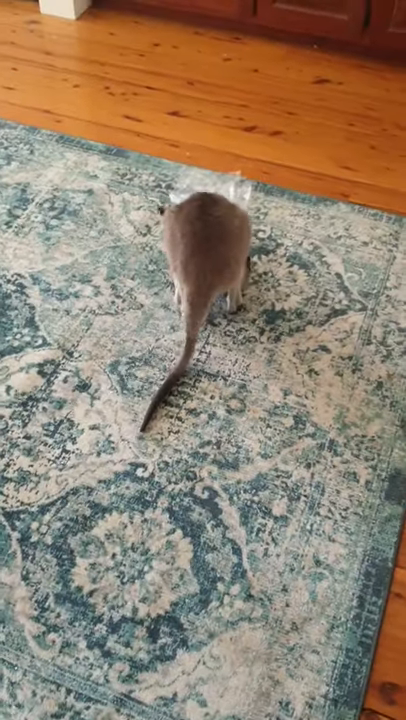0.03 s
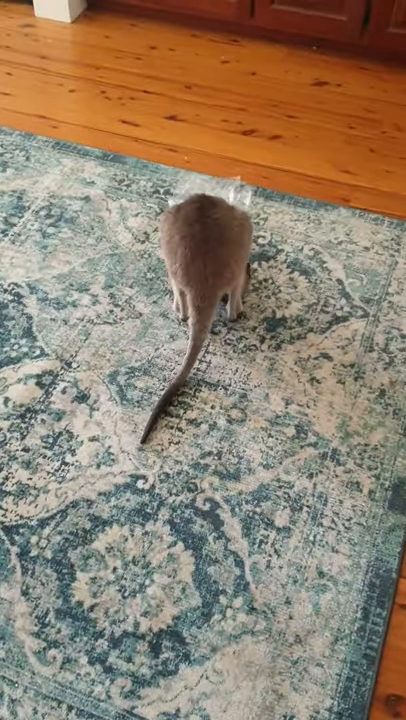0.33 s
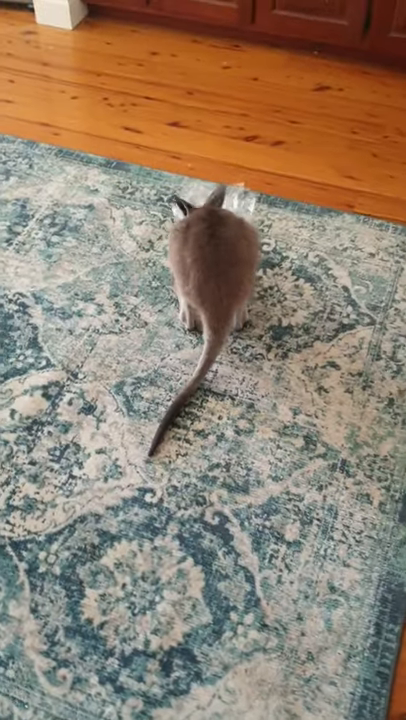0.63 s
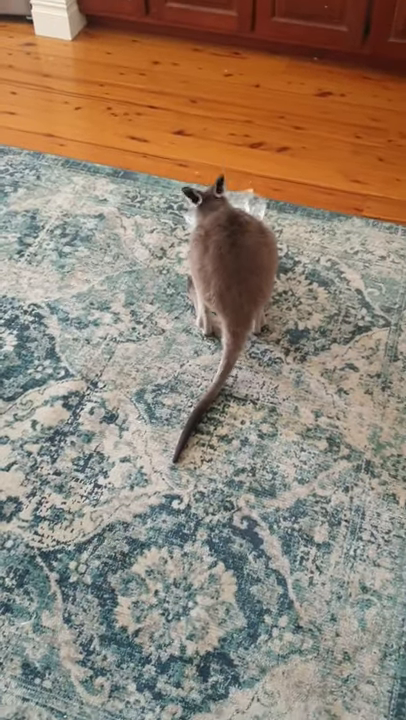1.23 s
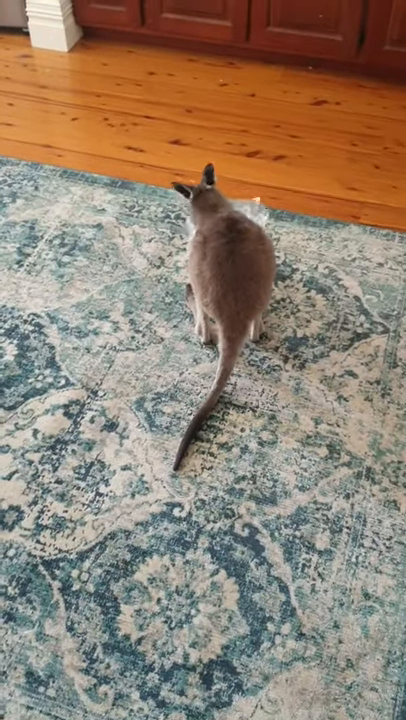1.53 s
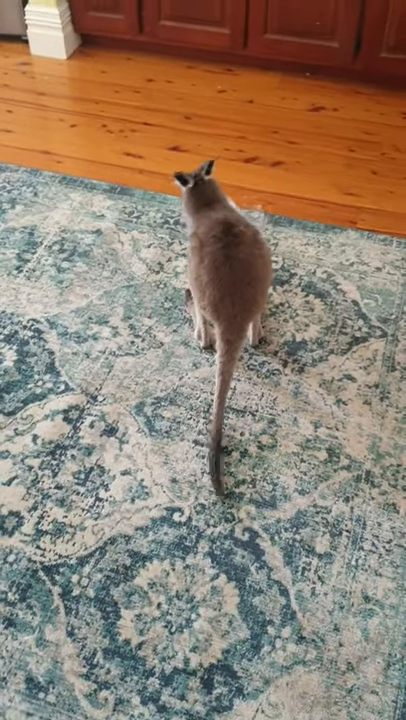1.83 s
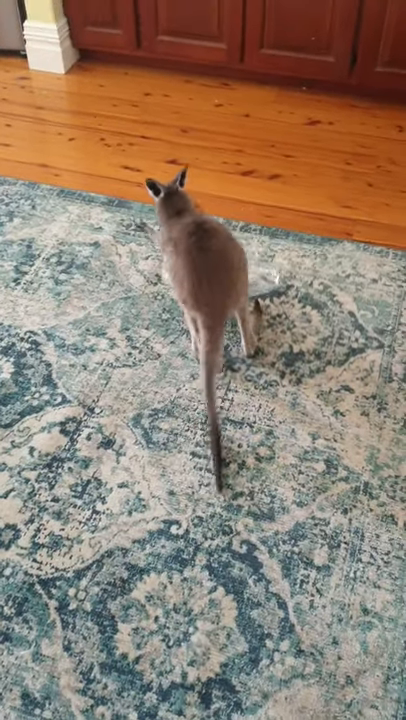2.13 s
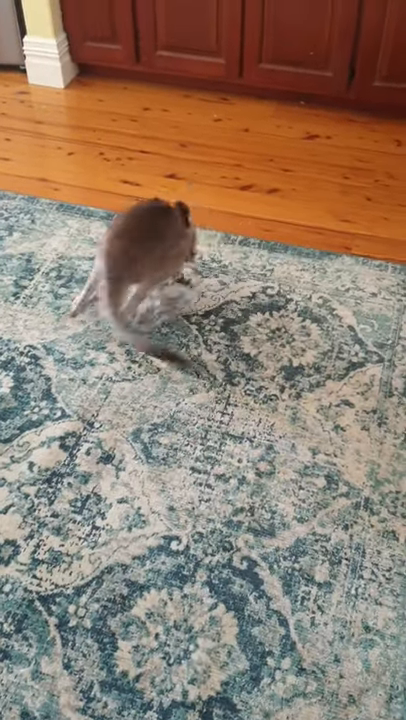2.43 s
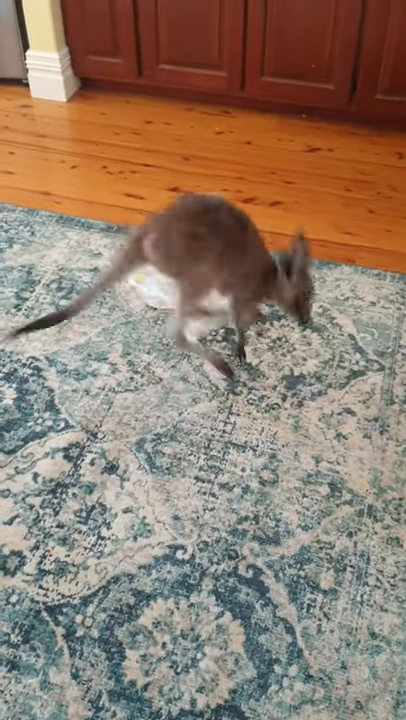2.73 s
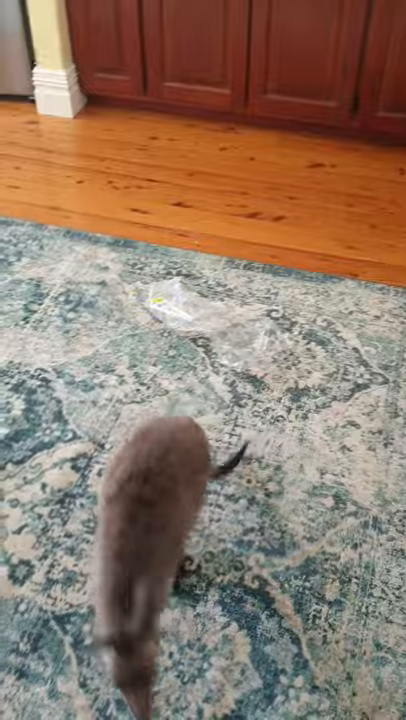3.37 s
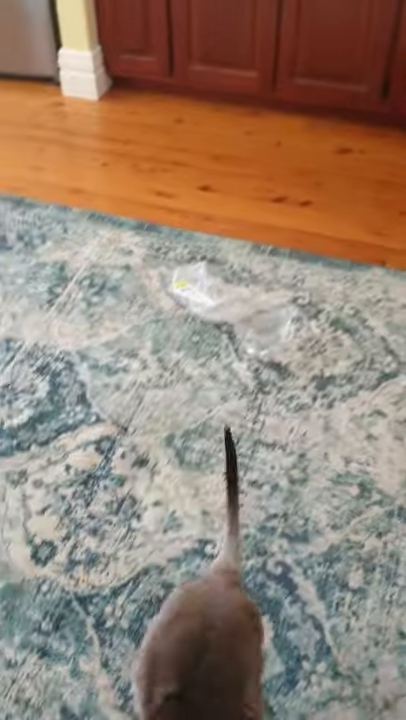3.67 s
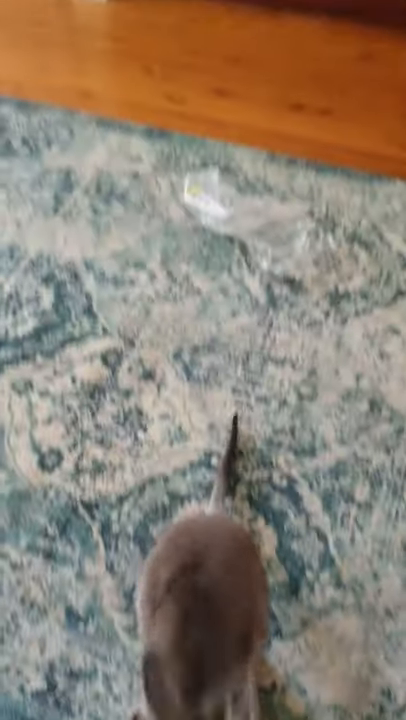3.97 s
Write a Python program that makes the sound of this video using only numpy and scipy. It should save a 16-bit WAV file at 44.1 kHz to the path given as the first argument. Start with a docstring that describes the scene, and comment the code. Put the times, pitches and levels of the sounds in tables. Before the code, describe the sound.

A thin plastic bag rustles faintly, then crinkles louder as a young kangaroo noses and drags it. Soft hops then thump on a rug over a wooden floor, coming towards a hand-held phone in a slightly echoing room.

```python
"""Young kangaroo with a plastic bag

A young kangaroo noses a thin plastic bag on a rug, drags it underfoot and hops towards a hand-held
phone. Creases of the film snap in dense swarms; landings shake the wooden floor, boards clack and
claws tick in a live room, and fur swishes over the pile. Fingers bump the phone; faint hiss, thin
whistles and a few short high chirps lie behind."""
import sys
import numpy as np
from scipy import signal
from scipy.fft import rfft, irfft
from scipy.io import wavfile
from scipy.ndimage import uniform_filter1d

SR = 44100
rng = np.random.default_rng(int(sys.argv[2]) if len(sys.argv) > 2 else 0)


def store_pcm(level_fs):
    """Save levels as 16-bit WAV."""
    pcm = np.round(np.clip(level_fs, -1, 1) * 32767).astype(np.int16)
    wavfile.write(sys.argv[1], SR, np.atleast_2d(pcm).T)


N = 176400
T = np.arange(N) / SR
FREQS = np.fft.rfftfreq(N, 1 / SR)

# how hard the bag is crumpled (time [s], level [dB])
CRUMPLE_CURVE = [(0, -68.5), (.5, -70.5), (.62, -62.5), (.72, -73.5), (.95, -63), (1.05, -55.5),
                 (1.15, -56.5), (1.3, -50), (1.4, -52.5), (1.52, -57.5), (1.555, -41), (1.63, -41.5),
                 (1.68, -38.5), (1.75, -44.5), (1.87, -36.5), (1.93, -39), (2.0, -33), (2.04, -35.5),
                 (2.08, -29), (2.16, -36.5), (2.24, -38), (2.33, -44), (2.39, -38), (2.415, -28),
                 (2.45, -24.5), (2.5, -31), (2.525, -23), (2.56, -34.5), (2.62, -42), (2.72, -41),
                 (2.775, -31.5), (2.82, -36.5), (2.88, -44), (2.96, -55), (3.15, -67), (4, -65.5)]
# tone of the plastic film (frequency [Hz], level [dB])
FILM_EQ = [(60, -6), (110, -7.5), (260, -3), (400, -0.5), (550, -5), (750, 2), (1000, -5), (1400, -2),
           (2050, 0), (2600, -3.5), (3500, -4.5), (5000, 0.5), (6000, -1), (6900, 1), (8000, -9.5),
           (9000, -17.5), (10200, -8), (11400, -2), (13000, -6), (14500, -11.5)]
# feet landing on the rug (time [s], level [dB], brightness [Hz], floor boom [dB])
FOOTFALLS = [(1.392, -47.5, 99, -3), (1.517, -45.5, 720, -27), (2.514, -29.5, 484, -2),
             (2.538, -26.5, 410, 1), (2.576, -32, 460, -13), (2.940, -34, 587, 0), (2.946, -23.5, 280, -17),
             (2.958, -27.5, 267, -4.5), (2.984, -26.5, 220, -25), (3.075, -39.5, 258, -14),
             (3.278, -29.5, 404, 2), (3.346, -26.5, 260, -4.5), (3.696, -33.5, 260, -31),
             (3.702, -25, 253, 6), (3.736, -26, 221.5, 0), (3.806, -35, 216, 3)]
# tone of a thud before its treble is softened (frequency [Hz], level [dB])
THUD_EQ = [(15, -56), (30, -21), (50, -5), (75, -6.5), (110, -5.5), (175, -1), (280, 1.5), (500, -5),
           (900, -3), (2000, 3), (5000, 9), (12000, -39)]
# modes of the wooden floor (frequency [Hz], level [dB], t60 [s])
FLOOR_MODES = [(48.1, -15, 0.81), (61.5, -13.5, 1), (87.5, -7, 0.46), (121, -4, 0.23), (148.4, -8.5, 0.51),
               (192.7, -2, 0.61), (226, -33, 0.25), (248.4, -22, .5), (282, -21, 0.61), (374, -33.5, 0.98)]
# boards giving and springing back underfoot (frequency [Hz], level [dB], t60 [s])
FLEX_MODES = [(140, -17, 0.076), (177.5, -4, 0.21), (259, -7, 0.11)]
# hard knocks on the boards (time [s], level [dB], pitch [ratio])
BOARD_KNOCKS = [(2.521, -25, 1.84), (2.536, -24, 1.47), (3.277, -17.5, 1.036), (3.331, -31.5, 1.34),
                (3.348, -39, 1.1), (3.704, -42, 0.75)]
# tone of a knock's attack at pitch 1 (frequency [Hz], level [dB])
CLACK_EQ = [(30, -65), (100, -40), (300, 2.5), (500, -0.5), (680, 2), (860, 9), (1150, -14), (1400, -9),
            (2100, -13), (2800, -41), (6000, -26.5), (9000, -58), (14000, -34)]
# modes of a knocked board at pitch 1 (frequency [Hz], level [dB], t60 [s])
PLANK_MODES = [(472, -3.5, .035), (640, -5.5, 0.018), (745, 2, 0.034), (823, -4.5, 0.028),
               (1285, -16.5, .03), (2030, -18, 0.053)]
# claws and single creases (time [s], level [dB], decay [s], top shelf [dB], room send [dB])
TICK_HITS = [(.183, -41.5, 0.0086, 17, -14), (.616, -50.5, 0.016, 9, -10.5), (0.642, -51.5, 0.028, 10, -14),
             (1.067, -53, 0.0044, -11, -18), (1.285, -43, 0.0043, 17, -3), (2.397, -42, 0.0018, 12, -14),
             (2.773, -35, 0.0068, -7, -3), (3.277, -32.5, 0.0017, 1, -8), (3.348, -36.5, 0.0053, -10, -5),
             (3.704, -24, 0.0018, -8.5, -6.5)]
# tone of a tick (frequency [Hz], level [dB])
TICK_EQ = [(30, -43), (300, -24), (1500, -6), (3000, -6.5), (4500, -2.5), (6500, -2), (9000, -22),
           (11500, -11), (14500, -19)]
# fur and tail brushing the rug (centre [s], half width [s], level [dB])
SWISHES = [(.62, 0.038, -68), (3.32, 0.026, -60), (3.44, 0.18, -56), (3.7, 0.16, -52.5)]
# tone of fur on the pile (frequency [Hz], level [dB])
FUR_EQ = [(100, -25), (1000, -9), (2500, 0.5), (4700, 1.5), (7000, 1), (9000, -27), (11500, -2),
          (14500, 1.5)]
# fingers bumping the phone (time [s], level [dB], pitch [Hz], decay [s], scuff [dB])
FINGER_HITS = [(.02, -44.5, 81, 0.071, -11), (0.082, -34, 61, 0.055, -38), (0.185, -30.5, 99, 0.0091, -7),
               (0.477, -35, 118, 0.004, -25), (0.608, -34.5, 138, 0.015, -10.5),
               (0.638, -44, 310, 0.017, -3.5), (1.022, -9, 239, 0.0017, -22),
               (1.029, -19.5, 160, 0.0026, -27), (1.044, -19.5, 161, 0.0041, -23)]
# thin whistles (start [s], end [s], pitch [Hz], level [dB])
WHISTLE_NOTES = [(.25, 1.25, 5510, -67), (.42, .95, 5893, -68), (3.05, 3.3, 5510, -70)]
# faint high chirps (start [s], length [s], from [Hz], to [Hz], level [dB])
CHIRP_NOTES = [(0.85, .08, 4350, 4380, -63), (0.968, 0.15, 4150, 5050, -56), (1.07, .09, 4750, 4550, -68),
               (1.26, 0.073, 4800, 4600, -71), (3.385, 0.117, 4700, 4850, -57),
               (3.56, 0.13, 4750, 4750, -65)]
# tone of the hiss (frequency [Hz], level [dB])
HISS_EQ = [(20, -24), (45, 0), (80, -9.5), (250, -13.5), (470, -8.5), (560, -19.5), (850, -20.5),
           (1300, -30), (1900, -40), (2500, -40.5), (3100, -23.5), (3700, -38.5), (4500, -27),
           (5700, -26.5), (7000, -25), (8800, -48.5), (11500, -28), (14500, -35)]
# reverb time of the room (frequency [Hz], t60 [s])
ROOM_DECAY = [(60, 0.71), (160, 0.41), (420, 0.75), (1100, 0.9), (3000, 0.81), (7500, 0.51), (14000, 0.21)]
# response of the weaker left microphone (frequency [Hz], gain [dB])
LEFT_MIC_EQ = [(60, -10.5), (250, -11), (600, -9), (1100, -9), (2300, -10.5), (4500, -11.5), (13000, -10)]

BAG_ROOM_DB, THUD_ROOM_DB, CLACK_ROOM_DB = -1.5, 4.5, 1  # reverb sends


def bag(peak_snaps_per_s=1100, rate_law=0.29, clump_s=0.0067, clump_db=1.5, trim_db=1.5):
    """Creases snap in clumps, faster and harder with the crumpling; each briefly rings the film."""
    crumple_db = np.interp(T, *np.array(CRUMPLE_CURVE).T)
    rate = peak_snaps_per_s * undb(rate_law * (crumple_db - crumple_db.max()))  # for each pitch
    snaps, t = np.zeros(N), T[:256]
    for hz in np.geomspace(500, 14000, 12):
        hits = (rng.random(N) < rate / SR) * rng.choice([-1, 1], N) / np.sqrt(rate)
        ring_s = 0.00049 * np.sqrt(2000 / hz)
        ring = np.exp(-t / ring_s) * np.sin(2 * np.pi * hz * t)
        snaps += unit(np.convolve(hits, ring)[:N]) * np.sqrt(hz)
    # flatten the swarm's own spectrum, then give it the film's tone
    swarm_db = 10 * np.log10(uniform_filter1d(np.abs(rfft(snaps)) ** 2, size=2001))
    film = unit(colour(snaps, on_log(FREQS, FILM_EQ) - swarm_db))
    env = undb(crumple_db + trim_db + clump_db * wobble(int(clump_s * SR)))
    return film * env / np.sqrt(1 + undb(BAG_ROOM_DB) ** 2)  # leave space for the reverb


def thuds(decay_s=0.013, rolloff_order=2.52, scrape_db=-2):
    """Each foot lands through the rug: one dull push and a weaker scrape."""
    out = 0
    for start, db, bright_hz, _ in FOOTFALLS:
        eq = on_log(FREQS, THUD_EQ) - 10 * rolloff_order * np.log10(1 + (FREQS / bright_hz) ** 2)
        push = np.zeros(N)
        push[int(start * SR)] = np.sqrt(decay_s * SR / 2)
        out += undb(db) * (colour(push, eq) + undb(scrape_db) * burst(start, decay_s, eq))
    return out


def floor_boom(flex_db=-0.5):
    """Each landing sets the whole floor booming and flexes the boards underfoot."""
    out = 0
    for start, db, _, boom_db in FOOTFALLS:
        out += undb(db + boom_db) * struck(FLOOR_MODES, start)
        out += undb(db + flex_db) * struck(FLEX_MODES, start)
    return out


def clacks(attack_decay_s=0.006, ring_db=4):
    """Hard knocks of foot on board, each with a short hollow ring."""
    out = 0
    for start, db, pitch in BOARD_KNOCKS:
        attack = burst(start, attack_decay_s, on_log(FREQS / pitch, CLACK_EQ))
        out += undb(db) * (attack + undb(ring_db) * struck(PLANK_MODES, start, pitch))
    return out


def ticks(tails):
    """Tiny bright contacts of claws and single creases; the nearer ones are drier."""
    top_shelf = on_log(FREQS, [(7000, 0), (11000, 1)])
    close, send = 0, 0
    for start, db, decay_s, top_db, room_db in TICK_HITS:
        tick = undb(db) * burst(start, decay_s, on_log(FREQS, TICK_EQ) + top_db * top_shelf)
        close += tick
        send += undb(room_db) * tick
    return direct(close) + echoes(send, tails)


def fur():
    """Soft swishes of fur over the pile."""
    env = sum(undb(db) * np.exp(-((T - centre) / width) ** 2) for centre, width, db in SWISHES)
    return env * stereo_noise(FUR_EQ)


def finger_bumps(scuff_hz=600, low_cut_hz=50):
    """Fingers knock the phone's case: a dry low pulse with a little scuff."""
    scuff = colour(rng.standard_normal(N), -20 * np.log10(1 + (FREQS / scuff_hz) ** 2))
    knocks = 0
    for start, db, hz, decay_s, scuff_db in FINGER_HITS:
        body = np.sin(2 * np.pi * hz * (T - start))
        knocks += undb(db) * fade(start, decay_s) * (undb(scuff_db) * scuff - body)
    return butter(knocks, 2, low_cut_hz, "high")


def whistles(fade_s=0.033):
    """Thin high tones that come and go at a steady pitch."""
    out = 0
    for start, end, hz, db in WHISTLE_NOTES:
        gate = np.clip(np.minimum(T - start, end - T) / fade_s, 0, 1)
        out += undb(db) * gate * np.sin(2 * np.pi * hz * T)
    return out


def chirps():
    """Short high glides with a slight waver in pitch."""
    waver = 1 + 0.008 * wobble(150)
    out = 0
    for start, length, from_hz, to_hz, db in CHIRP_NOTES:
        progress = np.clip((T - start) / length, 0, 1)
        hz = (from_hz + (to_hz - from_hz) * progress) * waver
        out += undb(db) * np.sin(np.pi * progress) * np.sin(2 * np.pi * np.cumsum(hz) / SR)
    return out


def background(hiss_db=-57.5, flutter_db=2, flutter_s=0.049):
    """A bed of quiet hiss, with whistles and chirps fluttering in level."""
    hiss = undb(hiss_db) * stereo_noise(HISS_EQ)
    tones = whistles() + chirps()
    return hiss + tones * undb(flutter_db * wobble(int(flutter_s * SR)))


def room_tails(alike_hz=440, build_s=0.0027, early_boost=0.59, early_s=0.024):
    """A stereo reverb tail, alike in the bass, with strong first reflections and a decay per band."""
    t, freqs = T[:SR], np.fft.rfftfreq(SR, 1 / SR)
    common, apart = rfft(rng.standard_normal((2, SR)))
    alike = 1 / (1 + (freqs / alike_hz) ** 4)
    noise = np.array([common, alike * common + np.sqrt(1 - alike ** 2) * apart])
    onset = (1 - np.exp(-t / build_s)) * (1 + early_boost * np.exp(-t / early_s))
    out = 0
    for band_hz, t60 in ROOM_DECAY:
        band = on_log(freqs, [(hz, hz == band_hz) for hz, _ in ROOM_DECAY])
        env = onset * np.exp(-np.log(1000) * t / t60)
        out += irfft(noise * band) * env / np.sqrt(np.sum(env ** 2))
    return out


def echoes(x, tails, cycle_s=0.2):
    """Reverb that crossfades round the tails, like the shifting echoes of a moving animal."""
    out = 0
    for k, tail in enumerate(tails):
        share = np.maximum(np.cos(2 * np.pi * (T / cycle_s - k / len(tails))), 0)
        out += signal.fftconvolve((share * x)[None], tail, axes=1)[:, :N]
    return out


def direct(x, shadow_hz=563):
    """Dry sound as (right, left): the left microphone is shadowed in the treble."""
    return np.array([x, butter(x, 1, shadow_hz, "low")])


def in_room(x, tails, room_db):
    """Direct sound plus its echoes."""
    return direct(x) + undb(room_db) * echoes(x, tails)


def struck(modes, start, pitch=1):
    """Modes that ring for up to half a second from one blow."""
    out, i, t = np.zeros(N), int(start * SR), T[:SR // 2]
    ring = sum(undb(db) * np.exp(-np.log(1000) * t / t60) * np.sin(2 * np.pi * hz * pitch * t)
               for hz, db, t60 in modes)
    out[i:i + len(t)] = ring[:N - i]
    return out / 2


def burst(start, decay_s, eq):
    """A short coloured scrape, level 1 at its start."""
    env = fade(start, decay_s)
    return unit(colour(env * rng.standard_normal(N), eq)) * np.sqrt(np.mean(env ** 2))


def fade(start, decay_s):
    """Sudden start and exponential fall."""
    return (T >= start) * np.exp(-np.maximum(T - start, 0) / decay_s)


def stereo_noise(points):
    """Wide coloured noise, rms 1 on each side."""
    return np.array([unit(colour(rng.standard_normal(N), on_log(FREQS, points))) for _ in range(2)])


def wobble(samples):
    """Smoothed random motion, rms 1."""
    return unit(uniform_filter1d(rng.standard_normal(N), size=samples))


def colour(x, eq):
    """Minimum-phase EQ of unit power gain, shaped by a dB value at each of FREQS."""
    cepstrum = irfft(np.log(unit(undb(eq))), N)
    cepstrum[1:N // 2] *= 2
    cepstrum[N // 2 + 1:] = 0
    impulse = irfft(np.exp(rfft(cepstrum)), N)[:N // 16]
    return signal.fftconvolve(x, impulse)[:N]


def butter(x, order, hz, kind):
    """Plain low-pass or high-pass."""
    return signal.sosfilt(signal.butter(order, hz, kind, fs=SR, output="sos"), x)


def on_log(hz, points):
    """Read (Hz, value) points on a log-frequency axis."""
    point_hz, values = np.array(points, float).T
    return np.interp(np.log(np.maximum(hz, 1)), np.log(point_hz), values)


def undb(db):
    """Decibels to gain."""
    return 10 ** (np.asarray(db) / 20)


def unit(x):
    """Scale to rms 1."""
    return x / np.sqrt(np.mean(x ** 2))


def scene(bump_left_db=-30, background_left_db=-22):
    """Bag and feet in the room, stronger on the right; handling noise and background on top."""
    tails = [room_tails() for _ in range(4)]
    feet = in_room(thuds(), tails, THUD_ROOM_DB) + floor_boom()
    crinkle = in_room(bag(), tails, BAG_ROOM_DB)
    boards = in_room(clacks(), tails, CLACK_ROOM_DB)
    right, left = crinkle + feet + boards + ticks(tails) + fur()
    left = irfft(rfft(left) * undb(on_log(FREQS, LEFT_MIC_EQ)), N)
    handling = finger_bumps() * undb([[bump_left_db], [0]])
    bed = background() * undb([[background_left_db], [0]])
    return np.array([left, right]) + handling + bed


def record(dry, gain_db=4.5, low_cut_hz=33, top_hz=14450):
    """The phone adds a steady gain, trims the deepest rumble and cuts the top."""
    trimmed = butter(dry * undb(gain_db), 3, low_cut_hz, "high")
    return signal.sosfilt(signal.ellip(10, .2, 80, top_hz, fs=SR, output="sos"), trimmed)


dry = scene()
out = record(dry)
store_pcm(out)
```